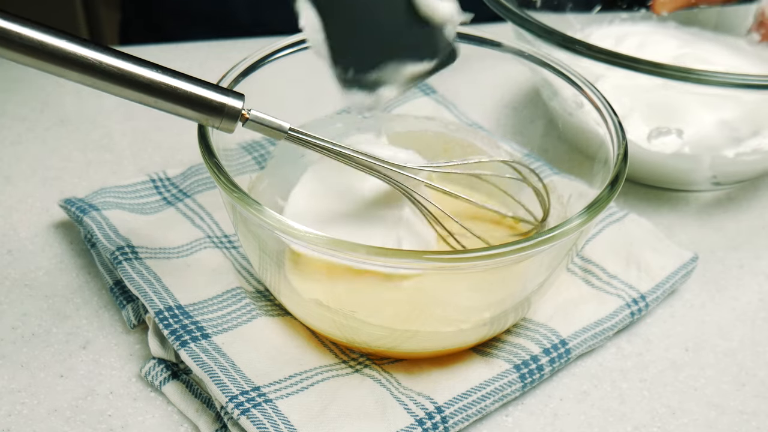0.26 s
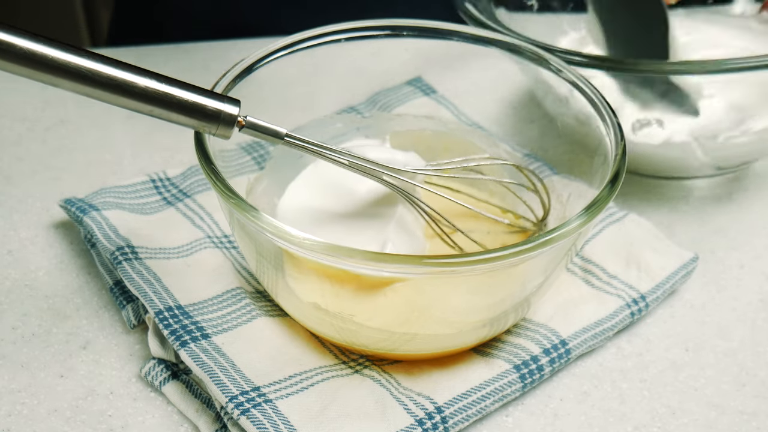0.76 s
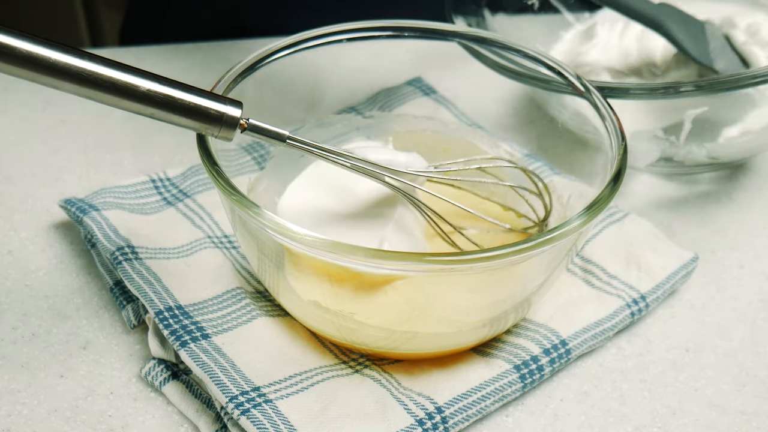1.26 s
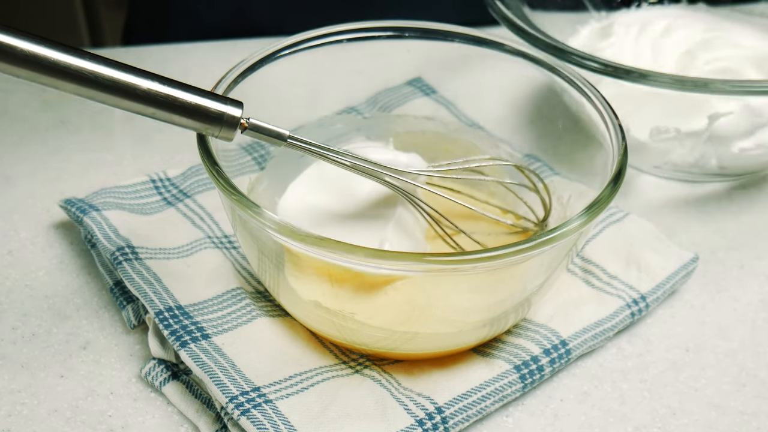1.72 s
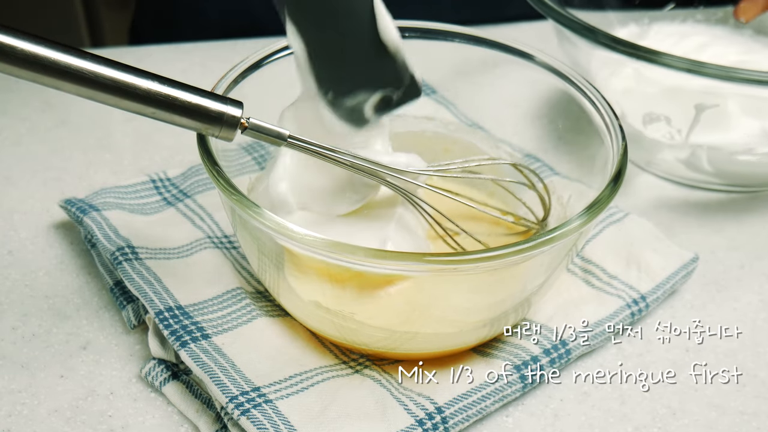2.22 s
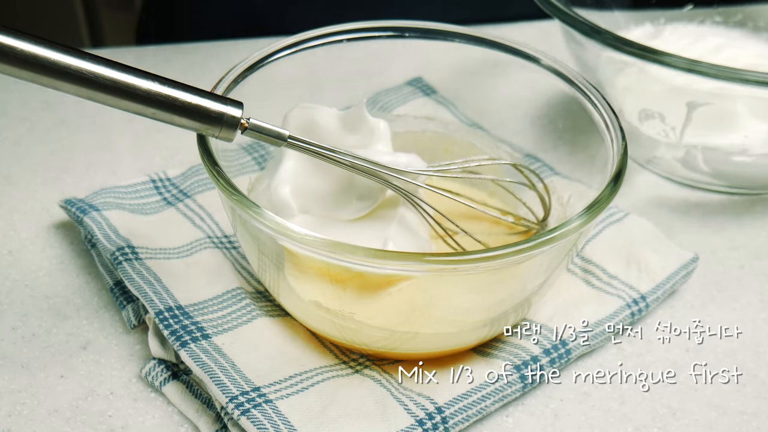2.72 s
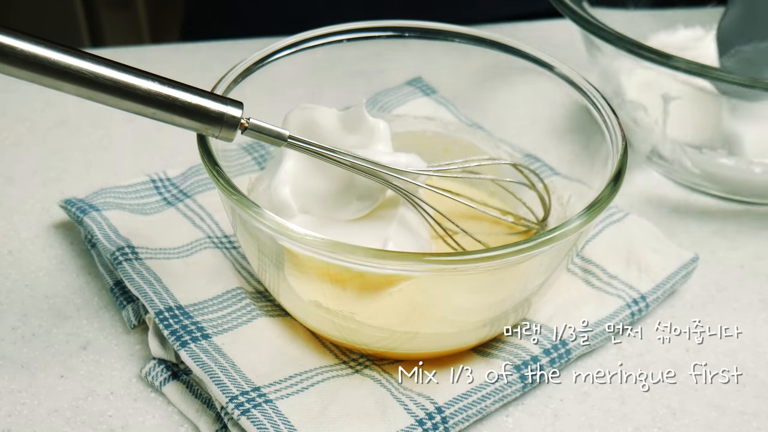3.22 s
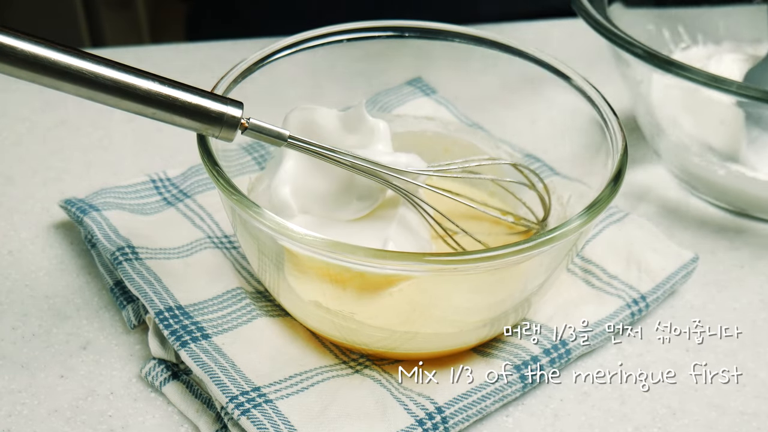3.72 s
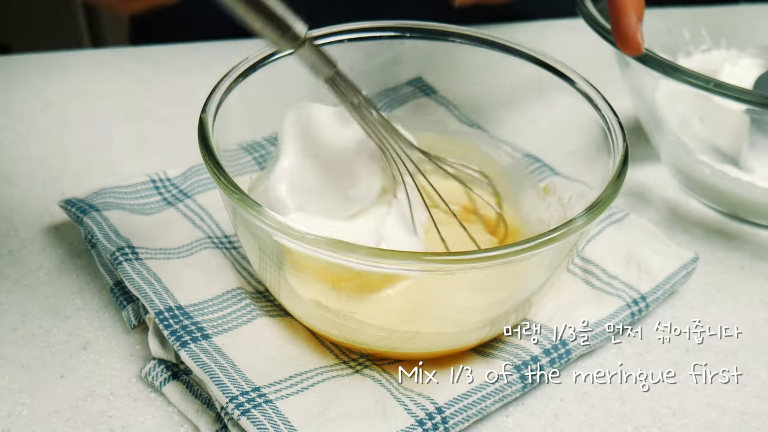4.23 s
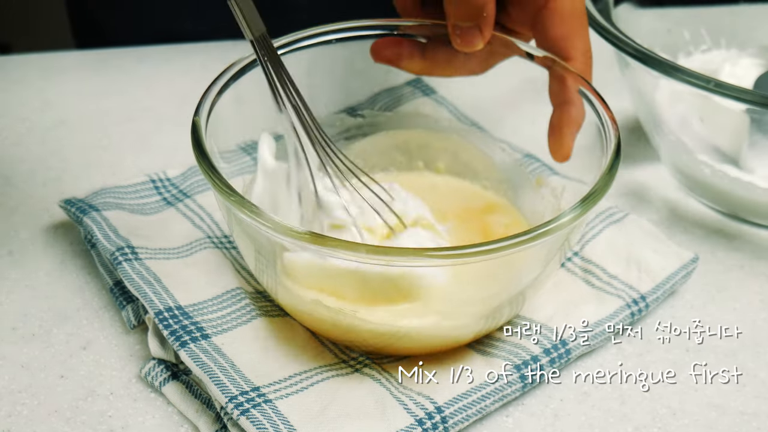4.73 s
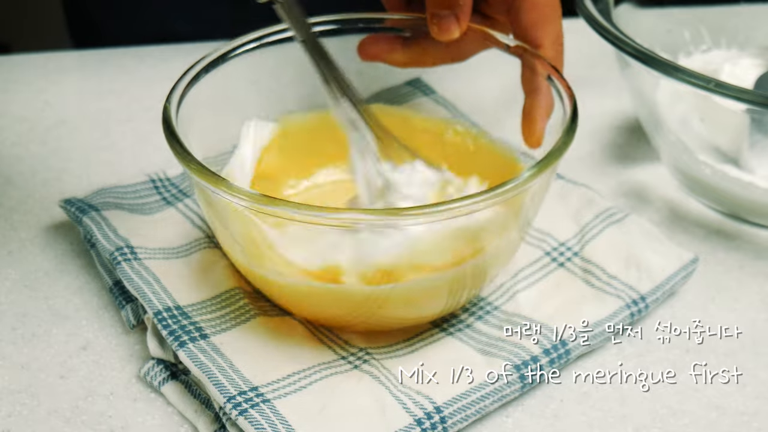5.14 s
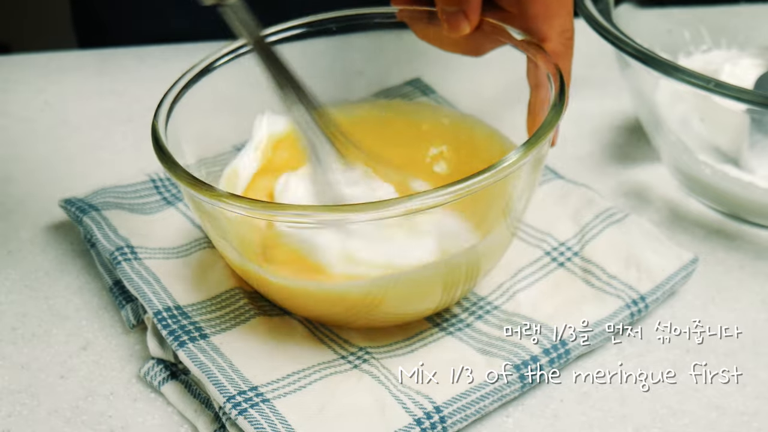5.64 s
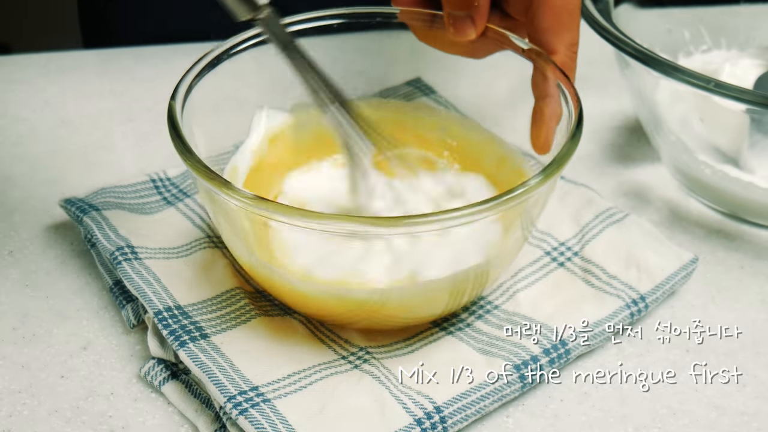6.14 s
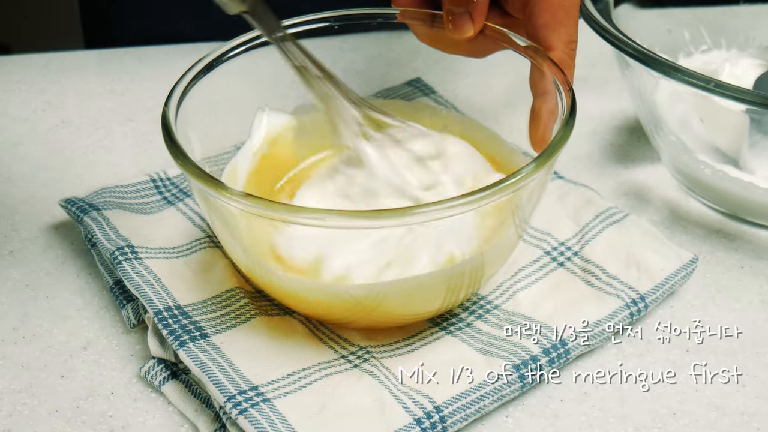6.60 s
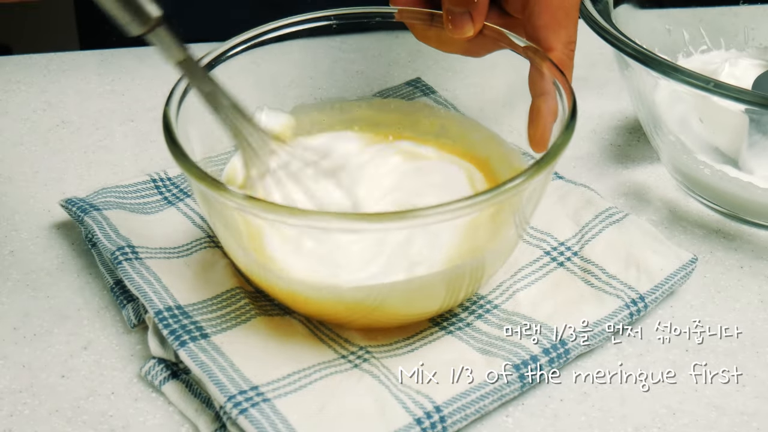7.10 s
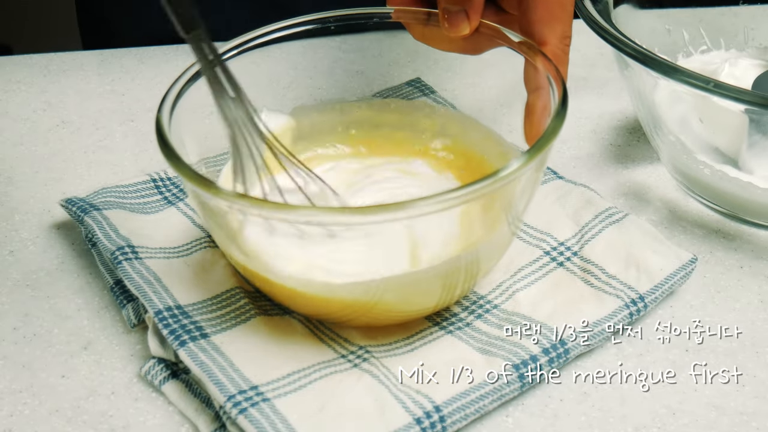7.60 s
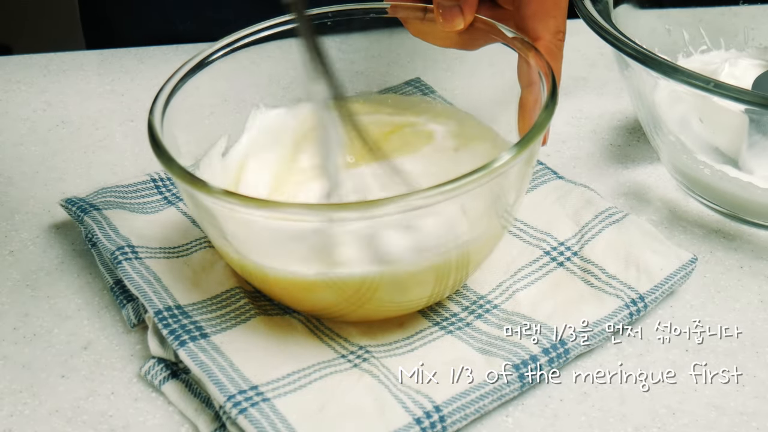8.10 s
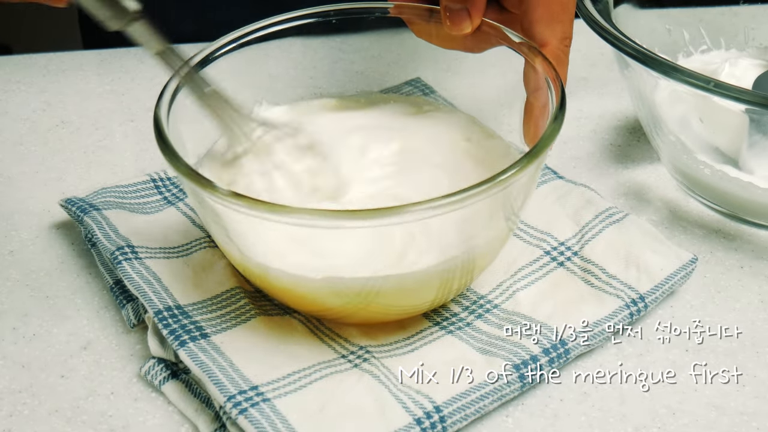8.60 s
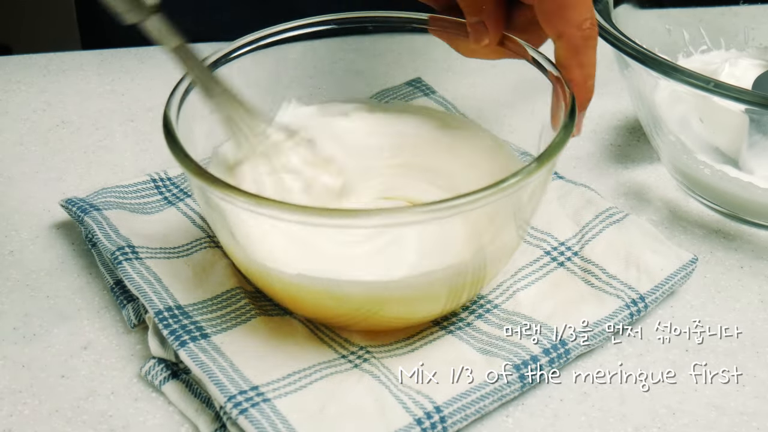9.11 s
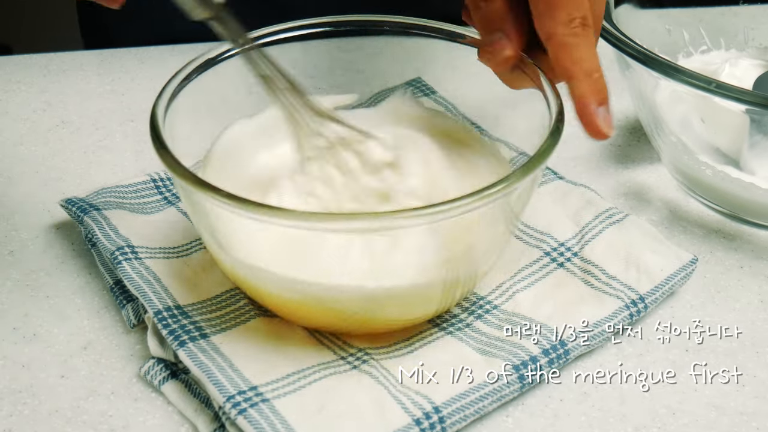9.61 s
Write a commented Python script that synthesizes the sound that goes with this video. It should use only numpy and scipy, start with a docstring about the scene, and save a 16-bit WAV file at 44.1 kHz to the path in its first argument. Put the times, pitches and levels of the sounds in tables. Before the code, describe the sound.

A quiet home kitchen, heard close and almost mono, with a faint refrigerator hum and soft air throughout. A brief spatula swish opens; a dull knock at 0.65 s leads into a loud, bright glass-on-glass clink at 0.73, with a lighter clinking cluster around 1.15. At 2.0 a hollow triple knock lands, followed by a short scraping slide. From 2.7 to 3.9 the bowl drags over the counter, with a heavy, dull set-down near 3.65. A soft swish and slight whisk contacts come around 4.1. From 4.7 a wire whisk stirs batter, tapping the glass wall sparsely and softly, with foam fizz. Taps thicken after 6.6; wet sloshing swells from about 7.2, and from 8 to 9.2 the ticking is rapid and uneven. The strongest sharp tap comes at 9.37, with a bright ringing touch just after, a low counter bump beneath, and final light taps near 9.75.

```python
"""Kitchen counter, two glass bowls: a spatula scoops from one, which clinks against its neighbour, slides and is
set down; then a wire whisk stirs batter in the other and taps its wall. A refrigerator hums throughout.
Glass and steel are dying sines plus noise bursts; stirring, drag and air are coloured noise; whistles are glides.
All sources sit at one spot, with a short room tail, level control and nearly mono channels."""
import sys
import numpy as np
from scipy import signal
from scipy.fft import rfft, irfft, next_fast_len
from scipy.io import wavfile
from scipy.ndimage import map_coordinates

SR = 44100
rng = np.random.default_rng(int(sys.argv[2]) if len(sys.argv) > 2 else 0)


def store_wav(level_fs):
    """Save 16-bit WAV to argv[1]."""
    pcm = np.round(np.clip(np.atleast_2d(level_fs), -1, 1) * 32767)
    wavfile.write(sys.argv[1], SR, pcm.T.astype(np.int16))


N = 434826

# Levels of colours, modes and notes are relative. Mode t60 holds before the ring share and 4.3 ms more.
# refrigerator hum lines: f/Hz, level/dB rms, waver/dB
HUM_LINES = [(70.8, -54, -0.5), (156.4, -60.5, 2.5), (294, -67.5, -4.5)]
# narrow steady noise: f/Hz, half width at half gain/Hz, level/dB
WHINE = (4113, 25, -79)
# kitchen air noise: f/Hz, density/dB
AIR_COLOUR = [(20, -25.5), (40, -5), (60, -23.5), (100, -12), (160, -11), (240, -8.5), (390, -7.5),
              (500, -15), (800, -18.5), (1150, -21.5), (2400, -62.5), (4200, -40.5), (9000, -66.5),
              (16000, -53)]
AIR_DB = -56

# spatula, bowl foot and wires moving: start/s, end/s, swish level/dB, fizz level/dB
STROKES = [(0.06, 0.284, -63, -61.5), (2.06, 2.351, -59, -77), (2.71, 3.94, -58, -94),
           (3.955, 4.42, -57.5, -63.5), (4.403, 5.06, -59.5, -66), (5.06, 8.125, -72.5, -69.5),
           (8.06, 9.095, -62, -70), (9.105, 9.9, -67, -69)]
# f/Hz, density/dB
SWISH_COLOUR = [(290, -37.5), (500, -1.5), (918, 1.5), (1540, -2), (1870, -6), (2330, -8), (2690, -8.5),
                (5910, -8.5), (11000, -26.5), (14300, -59.5), (22000, -120)]
# f/Hz, density/dB
FIZZ_COLOUR = [(5000, -8), (9000, -11.5), (16000, -9.5)]
# batter folding around the wires: t/s, level/dB
SLOSH_LEVELS = [(4.3, -80), (5.7, -69.5), (7.24, -60), (7.8, -62.5), (8.1, -60), (8.9, -61.5), (9.2, -73),
                (9.86, -67)]
# f/Hz, density/dB
BATTER_COLOUR = [(250, -34), (500, 1), (900, 5), (1600, -10.5), (3000, -40), (8000, -23.5)]
REST_SWISH_DB, REST_FIZZ_DB = -62.5, -75  # foam left alone
EDGE_S = .045  # fade in and out of a stroke

# thin paired whistles: start/s, length/s, top f/Hz, arc depth/share, upper level/dB, lower level/dB
WHISTLES = [(.217, 0.053, 14300, .03, -85, -65), (2.02, 0.073, 13600, .055, -72, -72),
            (2.148, 0.073, 14500, .08, -72, -67), (2.28, .058, 14550, .05, -67, -70),
            (3.945, 0.25, 15800, .15, -65, -65)]
WHISTLE_RATIO, WHISTLE_TOP_AT = .92, .43  # lower over upper pitch; arc top, share of length

# glass on glass: t/s, level/dB, hardness/dB per octave, small rim level/dB, large rim level/dB, ring time/share
CLINKS = [(0.7289, -1, 5, -13, -25.5, 0.83), (0.735, -2.5, -5, -14, -13, .26),
          (.827, -18.5, 4, -18, -12, .81), (1.13, -10.5, -0.5, -17, -8.5, 0.57),
          (1.146, -17.5, 5.5, -13.5, -5, 0.16), (1.153, -16, -5, -0.5, -13, 0.52),
          (1.162, -20.5, 6.5, -25, -5, .57), (1.169, -25, 10.5, -37, -3, 0.54)]
# bowl on counter or spatula: t/s, level/dB, hardness/dB per octave, hollow f/Hz, hollow level/dB,
# wall level/dB, ring time/share
DULL_KNOCKS = [(.643, -18.5, -8, 1245, -11, -17, 0.11), (1.084, -36.5, -3.5, 810, -7, -16.5, 1),
               (1.388, -29, -11.5, 950, -4, -21, 0.66), (1.989, -14.5, -4, 914, -15, -30, 0.39),
               (1.996, -17, -11.5, 1222, -1, -24, 0.21), (2.002, -14, -4.5, 1264, -7.5, -17.5, 0.37),
               (2.073, -34, -8.5, 1120, -8, -22, 0.55), (3.6505, -9.5, -6.5, 880, -17.5, -1.5, 0.92),
               (3.6555, -5.5, -14, 1270, -6.5, -17, 0.31), (3.672, -13.5, -13, 785, -10, -3, 0.76)]
CLINK_T60_S, CLINK_HOLLOW_HZ, CLINK_HOLLOW_DB, CLINK_WALL_DB = 0.05, 1290, -6.5, -15  # t60 of the crack
KNOCK_T60_S, KNOCK_RIM_DB = 0.078, -40  # t60 of the crack; the rims barely answer
# glass contact: f/Hz, level/dB
CRACK_COLOUR = [(150, -25), (400, 1.5), (1000, 10), (2500, 2.5), (6000, -17), (16000, -46)]
# bowl wall under a broad contact: f/Hz, level/dB, t60/s
WALL_MODES = [(305, -9, .11), (391, -15, .11), (502, -10, .09), (709, 0, .2), (1765, -11, .22)]
# smaller bowl rim: f/Hz, level/dB, t60/s
SMALL_RIM = [(1880, -6, .3), (2116, -12, .3), (2353, -14, .3), (3090, -4, .2), (3175, -1, .22),
             (3305, -4, .3), (4940, -8, .25), (6380, -18, .3), (6680, -15, .33), (7840, -14, .3),
             (8414, -25, .3), (9491, -27, .3), (10660, -24, .2), (11950, -23, .25), (12700, -26, .3),
             (14740, -28, .3)]
# larger bowl rim: f/Hz, level/dB, t60/s
LARGE_RIM = [(1744, -9, .3), (1949, -6, .26), (2033, -2, .16), (3230, -8, .24), (3365, -3, .19),
             (4753, -13, .25), (4846, -4, .22), (6880, -16, .36), (6977, -17, .34), (7203, -19, .3),
             (9184, -19, .22), (11840, -26, .3), (14720, -30, .25)]
# crowds of rim modes too dense to part: f/Hz, width/Hz, level/dB
CLATTER_PEAKS = [(1170, 300, 20), (2000, 180, -6), (3340, 200, -1), (4940, 300, 16), (6600, 500, -29.5),
                 (7610, 70, -38), (8800, 130, -24.5), (11700, 740, -17)]
BLUR_RAD = .36  # phase wander of ringing glass at 3 kHz per 32 samples

# bowl foot dragged over the counter: start/s, end/s, early colour level at start/dB, late colour level at end/dB
SLIDES = [(2.106, 2.363, -55.5, -60), (2.7, 3.265, -54.5, -63), (3.278, 3.948, -61, -52)]
# f/Hz, width/Hz, level/dB
EARLY_DRAG_PEAKS = [(910, 43, 4), (1120, 38, 5), (1510, 83, -1), (2150, 55, 3.5), (2400, 23, 4),
                    (2980, 49, -9), (4340, 51, -10)]
# f/Hz, width/Hz, level/dB
LATE_DRAG_PEAKS = [(1228, 46, 9), (1670, 20, 4), (2990, 200, -6), (4170, 95, -14), (4470, 100, -23)]
EARLY_FADE_DB, LATE_FADE_DB = 8.5, 0.5  # over the length of a drag
# counter shaken: start/s, end/s, level/dB
BUMPS = [(3.64, 3.87, -61), (9.25, 9.6, -57)]
# f/Hz, density/dB
BUMP_COLOUR = [(15, -41.5), (30, 10), (50, 2), (90, -35.5), (200, -120)]

# blows above the batter: t/s, level/dB, hardness/dB per octave, ring time/share, handle level/dB
RIM_BLOWS = [(4.125, -38.5, -11.5, 1.8, -30), (4.237, -42.5, -1, .6, 13), (7.838, -39.5, -21, 0.72, -30),
             (8.175, -28.5, -4.5, 0.52, -21), (8.459, -39, -8, 0.53, -16), (8.875, -40, -8, .6, -20),
             (9.415, -24, 4.5, 0.66, -20.5), (9.441, -31.5, 8, 0.43, 1), (9.781, -41, -16, 0.5, -30)]
# batter bowl rim: f/Hz, level/dB, t60/s
BATTER_RIM = [(752, -3.5, .19), (1735, -10.5, .15), (3070, -5.5, .19), (4735, -9, .16), (6751, -4, .17),
              (9141, -9, .22), (10600, -17, .1), (11960, -15, .08), (13950, -19, .1), (14670, -20, .1)]
# steel tube of the whisk: f/Hz, level/dB, t60/s
HANDLE_MODES = [(3200, -10.5, 0.29), (4915, -2, 0.091), (6200, -13.5, 0.18), (6790, -8, .22),
                (7100, -13, .15), (7800, -17, 0.22), (8660, -23, .15), (11000, -22, .2), (13090, -20, .2),
                (15200, -18, 0.09)]
# whisk on wall: t/s, level/dB, treble/dB, cavity f/Hz, cavity level/dB before trim, thud level/dB before trim
TAPS = [(4.725, -25, -15.5, 1336, -15, -15.5), (4.969, -39, -8, 980, -12, -11),
        (5.027, -34, -23.5, 1360, -20, -30), (5.379, -42, -18, 805, -22, -21),
        (5.557, -37.5, -34, 1206, -9, -19), (5.793, -35.5, -16, 1200, -7, -12),
        (6.008, -33.5, -25.5, 906, -10.5, -29), (6.088, -39, -7.5, 930, -26, -20),
        (6.196, -38.5, -2.5, 760, -21, -24), (6.228, -33.5, -18.5, 1330, -6.5, -15),
        (6.666, -28.5, -24, 1234, -6.5, -17), (6.885, -28, -21.5, 1243, -6.5, -27.5),
        (7.104, -36, -20, 1300, -4.5, -8), (7.311, -23, -11.5, 852, -7, -23),
        (7.378, -45, -17, 1057, -2, 4), (7.458, -45, -29, 1330, -1, -16), (7.516, -44, -20, 1030, -5, -14),
        (7.532, -26.5, -15, 1260, -7, -11), (7.557, -44, -21, 1145, 1, -18),
        (7.838, -35, -11.5, 798, 1.5, -18), (7.926, -34, -38, 977, -3.5, -13),
        (8.046, -38.5, -31.5, 723, -0.5, -8), (8.103, -31.5, -16, 750, -8, -9),
        (8.167, -35, -15.5, 703, -13, -12), (8.176, -22.5, -14.5, 900, -20, -31),
        (8.277, -25, -16, 908, -3.5, -39), (8.318, -40, -15, 820, -5, -28),
        (8.336, -26.5, -15.5, 780, -12.5, -34), (8.366, -40, -18, 1190, -3, -31),
        (8.387, -23.5, -14, 1197, -13, -26), (8.456, -21.5, -18, 1282, -11.5, -20.5),
        (8.548, -42.5, -11, 1010, -11, -13), (8.579, -22, -16.5, 980, -16, -13),
        (8.609, -24.5, -16, 694, -14, -11.5), (8.665, -40.5, -13.5, 1030, -11, -19),
        (8.688, -33, -17, 1210, -10, -24), (8.779, -41, -4, 685, -17, -30),
        (8.798, -17, -4.5, 1200, -15, -24), (8.844, -20.5, -13, 1356, -21, -13),
        (8.873, -30, -17.5, 1250, -7.5, -6), (8.914, -34.5, -20, 830, -17, -23),
        (8.955, -21, -17.5, 1390, -17, -30), (9.098, -21.5, -14.5, 966, -15.5, -14),
        (9.138, -33, -16, 765, -19, -18), (9.169, -29, -19, 1300, -8, -19),
        (9.336, -56, -13, 814, -16, -19), (9.372, -8.5, -6, 1260, -25, -28.5),
        (9.417, -27, -5, 796, -25, -41), (9.441, -26.5, 1, 780, -19, -38),
        (9.523, -33, -15, 908, -6.5, -12), (9.72, -27.5, -25.5, 1083, -6, -19),
        (9.771, -34, -23, 1300, -5, -19)]
# tap noise: f/Hz, level/dB, share of the tap's treble added
TAP_COLOUR = [(300, -6.5, 0), (600, 6, 0), (1100, 5, 0), (3500, 1.5, 0),
              (6500, 14.5, 1), (8500, -1.5, 1), (11500, 3.0, 1), (16000, -11, 1)]
TAP_RISE_S, TAP_T60_S = 0.001, 0.051
LANDING_DB = 3.5  # scatter of the wire contacts
WIRE_HZ, WIRE_DB, WIRE_T60_S = 2920, -13, .028  # WIRE_HZ holds at -20 dB treble
WIRE_CLIMB = 0.078  # octaves per dB of treble
THUD_HZ = 330.3  # bowl bouncing on the cloth
CAVITY_TRIM_DB, THUD_TRIM_DB = 1.0, 0.5
FAINT_FROM_S, FAINT_TO_S, FAINT_DB = 5.2, 9.4, -43  # weak taps between the strong ones; loudest level

# room decay: f/Hz, t60/s
ROOM_T60 = [(200, 0.44), (2000, 0.28), (12000, 0.19)]
# channel mismatch: f/Hz, side relative to mid/dB
MISMATCH = [(100, -43.5), (1000, -64.5), (4000, -48.5), (15000, -37.5)]
# noise the channels do not share: f/Hz, density/dB
HISS_COLOUR = [(18, -69), (30, -28.5), (179, 1.5), (319, -6), (364, 4.5), (760, -0.5), (2540, -1),
               (14000, -2.5), (16000, -14.5)]
HISS_DB = -78
CEILING, TOP_HZ = .8, 16100  # peak limit; band limit


def amp(db):
    """Gain of a level in dB."""
    return 10 ** (np.asarray(db) / 20)


def unit(x):
    """x at rms 1."""
    return x / np.sqrt(np.mean(x ** 2) + 1e-20)


def along(points, hz):
    """(Hz, value) points interpolated on a log axis."""
    f, v = np.transpose(points)
    return np.interp(np.log(hz + 1), np.log(f + 1), v)


def curve(points, outside=None):
    """(s, value) points interpolated at every sample."""
    s, v = np.transpose(points)
    return np.interp(np.arange(N) / SR, s, v, outside, outside)


def wobble(rate_hz):
    """Smooth random curve, rate_hz knots a second."""
    knots = rng.standard_normal(int(N * rate_hz / SR) + 4)
    return map_coordinates(knots, [np.arange(N) * rate_hz / SR])


def stroke(start_s, end_s):
    """Gain that fades in, holds and fades out."""
    t = np.arange(N) / SR
    return np.clip(np.minimum(t - start_s, end_s - t) / EDGE_S + .5, 0, 1)


def filtered(x, response):
    """x times a response of frequency."""
    m = next_fast_len(len(x) + 4096)
    return irfft(rfft(x, m) * response(np.fft.rfftfreq(m, 1 / SR)), m)[:len(x)]


def coloured(points):
    """Gain over frequency from (Hz, dB) points."""
    return lambda hz: amp(along(points, hz))


def resonances(peaks):
    """Gain of a sum of (Hz, width Hz, dB) resonance peaks."""
    return lambda f: sum(amp(db) * w * f / np.abs(c * c - f * f + 1j * f * w) for c, w, db in peaks)


def noise(gain, size=N):
    """Noise of rms 1 with a colour."""
    return unit(filtered(rng.standard_normal(size), gain))


def ring(modes, t, share=1, hard_db=0, scatter_db=0, rough=0):
    """Dying sines at random strengths; hardness tilts modes above 3 kHz, rough blurs the phase."""
    hz, db, t60 = np.array(modes).T[:, :, None]
    level_db = db + hard_db * np.maximum(np.log2(hz / 3000), 0)
    level_db = level_db + scatter_db * rng.standard_normal(hz.shape)
    steps = rng.standard_normal((len(hz), len(t) // 32 + 1)).repeat(32, axis=1)[:, :len(t)]
    drift = np.cumsum(steps, axis=1) / 32
    fade = amp(level_db - 60 * t / (np.abs(t60 * share) + 0.0043))
    phase = 2 * np.pi * hz * t + rough * np.sqrt(hz / 3000) * drift
    return np.sum(fade * np.sin(phase), axis=0)


def add(track, s, x):
    """Mix x into track from time s."""
    track[round(s * SR):][:len(x)] += x


def kitchen():
    """Hum lines wavering in level and phase, and a faint narrow whine, over steady air noise."""
    t, hum = np.arange(N) / SR, np.zeros(N)
    for hz, db, waver_db in HUM_LINES:
        level = np.sqrt(2) * amp(db + waver_db * wobble(9.1))
        hum += level * np.sin(2 * np.pi * hz * t + 0.2 * waver_db * wobble(6.6))
    whine_hz, half_width_hz, whine_db = WHINE
    whine = amp(whine_db) * noise(lambda hz: 1 / (1 + ((hz - whine_hz) / half_width_hz) ** 2))
    return hum + whine + amp(AIR_DB) * noise(coloured(AIR_COLOUR))


def stirring():
    """Spatula and wires swish; foam bubbles fizz as noise of fast uneven level; batter sloshes in lumps."""
    swish_gain = np.hypot(amp(REST_SWISH_DB), sum(amp(db) * stroke(a, b) for a, b, db, _ in STROKES))
    fizz_gain = np.hypot(amp(REST_FIZZ_DB), sum(amp(db) * stroke(a, b) for a, b, _, db in STROKES))
    swish = swish_gain * amp(1.6 * wobble(30) + 1.2 * wobble(6)) * noise(coloured(SWISH_COLOUR))
    spikes = rng.standard_normal(N) * amp(2.8 * wobble(880))
    fizz = fizz_gain * amp(1.1 * wobble(16.0)) * unit(filtered(spikes, coloured(FIZZ_COLOUR)))
    lumps = unit(amp(4.5 * wobble(45)) * noise(coloured(BATTER_COLOUR)))
    return swish + fizz + amp(curve(SLOSH_LEVELS, outside=-120)) * lumps


def whistles():
    """Faint high tones glide along arcs, two at a time, with a fluttering level."""
    track, flutter_db = np.zeros(N + SR), 3 * wobble(40)
    for start_s, length_s, top_hz, depth, upper_db, lower_db in WHISTLES:
        u = np.linspace(0, 1, round(length_s * SR))
        hz = top_hz * (1 - depth * (2 * (u - WHISTLE_TOP_AT)) ** 2)
        phase = 2 * np.pi * np.cumsum(hz) / SR
        pair = amp(upper_db) * np.sin(phase) + amp(lower_db) * np.sin(WHISTLE_RATIO * phase)
        add(track, start_s, np.abs(np.sin(np.pi * u)) ** 0.33 * pair)
    return amp(flutter_db) * track[:N]


def bowls():
    """Each contact is a noisy crack, a short hollow note and the ring of wall and rims."""
    track, t = np.zeros(N + SR), np.arange(SR // 3) / SR
    clinks = [(s, db, hard_db, CLINK_T60_S, CLINK_HOLLOW_HZ, CLINK_HOLLOW_DB, CLINK_WALL_DB, *rims)
              for s, db, hard_db, *rims in CLINKS]
    knocks = [(s, db, hard_db, KNOCK_T60_S, *wall, KNOCK_RIM_DB, KNOCK_RIM_DB, share)
              for s, db, hard_db, *wall, share in DULL_KNOCKS]
    for s, db, hard_db, t60_s, hollow_hz, hollow_db, wall_db, small_db, large_db, share in clinks + knocks:
        colour = lambda hz: amp(along(CRACK_COLOUR, hz) + hard_db * np.log2(hz / 1000 + 0.022))
        crack_fade = amp(-7.5 - 60 * t / t60_s) + amp(-9 - 60 * t / 0.0056)
        crack = crack_fade * noise(colour, size=len(t))
        clatter_fade = amp(-6.5 - 60 * t / (0.089 * abs(share) + 0.0083))
        clatter = clatter_fade * noise(resonances(CLATTER_PEAKS), size=len(t))
        rim = amp(max(small_db, large_db)) * clatter
        for rim_db, modes in [(small_db, SMALL_RIM), (large_db, LARGE_RIM)]:
            rim = rim + amp(rim_db) * ring(modes, t, share, scatter_db=5.0, rough=BLUR_RAD)
        wall = amp(wall_db) * ring(WALL_MODES, t, share, scatter_db=1.5)
        hollow = ring([(hollow_hz, hollow_db, .07)], t, rough=0.68)
        onset = 1 - np.exp(-t / (0.0003 * amp(-.4 * hard_db)))  # soft contacts build up slowly
        add(track, s, amp(db) * (crack + wall + hollow + rim) * onset)
    return filtered(track[:N], lambda hz: (1j * hz / (150 + 1j * hz)) ** 2)  # steep cut of the bass below 150 Hz


def slide():
    """Dragging feeds noise into resonances that change on the way; low noise shakes the counter."""
    early = sum(amp(curve([(a, db), (b, db - EARLY_FADE_DB)])) * stroke(a, b) for a, b, db, _ in SLIDES)
    late = sum(amp(curve([(a, db + LATE_FADE_DB), (b, db)])) * stroke(a, b) for a, b, _, db in SLIDES)
    drag = early * noise(resonances(EARLY_DRAG_PEAKS)) + late * noise(resonances(LATE_DRAG_PEAKS))
    drag = amp(1.8 * wobble(60)) * drag
    shake = noise(coloured(BUMP_COLOUR)) * sum(amp(db) * stroke(a, b) for a, b, db in BUMPS)
    return drag + shake


def rim_blows(track):
    """Whisk blows above the batter ring the glass rim and the steel handle."""
    t = np.arange(SR // 4) / SR
    for s, db, hard_db, share, handle_db in RIM_BLOWS:
        colour = lambda hz: amp(along(CRACK_COLOUR, hz) + hard_db * np.log2(hz / 3000 + .05))
        click = amp(-37.0 - 60 * t / .03) * noise(colour, size=len(t))
        glass = ring(BATTER_RIM, t, share, hard_db, scatter_db=5.0, rough=BLUR_RAD / 2)
        handle = amp(handle_db) * ring(HANDLE_MODES, t, rough=0.065)
        add(track, s, amp(db - 6.5) * (click + glass + handle))


def faint_taps(count):
    """Rows like TAPS at random times, growing slightly denser."""
    rows = []
    for when, size, bright, pitch, thud in rng.random((count, 5)):
        s = FAINT_FROM_S + (FAINT_TO_S - FAINT_FROM_S) * when ** 0.87
        rows.append((s, FAINT_DB - 8 * size, -32 + 24 * bright, 720 * 1.9 ** pitch, -6, -20 + 20 * thud))
    return rows


def wall_taps(track):
    """Wires land unevenly on the wall: a noise tick with cavity, wire and thud notes."""
    t = np.arange(SR // 7) / SR
    f_hz, base_db, treble_share = np.transpose(TAP_COLOUR)
    for s, db, treble_db, cavity_hz, cavity_db, thud_db in TAPS + faint_taps(count=60):
        colour = coloured(np.transpose([f_hz, base_db + treble_share * treble_db]))
        landing = amp(LANDING_DB * np.repeat(rng.standard_normal(len(t) // 64 + 1), 64)[:len(t)])
        fade = amp(-10.5 - 60 * t / TAP_T60_S) + amp(-12.5 - 60 * t / 0.017)  # sharp first contact, then the rest
        tick = fade * landing * noise(colour, size=len(t))
        tick = tick * np.linalg.norm(fade) / np.linalg.norm(tick)  # energy free of the random draw
        wire_hz = WIRE_HZ * 2 ** max(WIRE_CLIMB * (treble_db + 20), -.45)
        cavity = ring([(cavity_hz, cavity_db + CAVITY_TRIM_DB, .06)], t, rough=0.7)
        wire_thud = [(wire_hz, WIRE_DB, WIRE_T60_S), (THUD_HZ, thud_db + THUD_TRIM_DB, .12)]
        notes = cavity + ring(wire_thud, t, rough=0.17)
        add(track, s, amp(db) * (tick + notes) * (1 - np.exp(-t / TAP_RISE_S)) ** 2)


def whisk():
    """Rim blows and wall taps through a gentle bass cut."""
    track = np.zeros(N + SR)
    rim_blows(track)
    wall_taps(track)
    return filtered(track[:N], lambda hz: 1j * hz / (120 + 1j * hz))


def prickle(count, level_db, spread_db):
    """Single wires flick the wall at random: damped blips of a few cycles."""
    track, t = np.zeros(N + SR), np.arange(400) / SR
    for when, pitch, size in rng.random((count, 3)):
        hz = 1200 * 7.5 ** pitch
        fade = amp(level_db - spread_db * np.log(size + 1e-3) - 60 * t * hz / 22)  # -60 dB in 22 cycles
        add(track, 4.4 + 5.4 * when ** .7, fade * np.sin(2 * np.pi * hz * t))
    return track[:N]


def room(x):
    """Noise tail in which each frequency dies at its own speed, as off the walls."""
    hz, t, z = signal.stft(rng.standard_normal(SR // 2), SR, nperseg=256)
    tail = signal.istft(z * amp(-60 * t / along(ROOM_T60, hz)[:, None]), SR, nperseg=256)[1]
    delayed = np.pad(x, (200, 0))
    return signal.fftconvolve(delayed, tail / np.linalg.norm(tail))[:N]


def scene():
    """All sources at one spot."""
    glass = bowls()
    wire = whisk() + prickle(count=650, level_db=-59.5, spread_db=2.5)
    echo = room(amp(-12.5) * glass + amp(-15) * wire)
    mono = kitchen() + stirring() + whistles() + glass + slide() + wire + echo
    return np.array([mono, mono])


def compressed(x, knee_db, slope, attack_s, release_s):
    """Gain falls when the short-term power passes the knee and returns slowly."""
    def smooth(v, s):
        """One-pole average over s seconds."""
        keep = np.exp(-1 / (s * SR))
        return signal.lfilter([1 - keep], [1, -keep], v)

    over_db = np.maximum(10 * np.log10(smooth(x ** 2, attack_s) + 1e-12) - knee_db, 0)
    cut_db = np.maximum(smooth(over_db, attack_s), 3.7 * smooth(over_db, release_s))
    return x * amp(-slope * cut_db)


def record(dry):
    """Gain control, then channels that differ by hiss and a faint smeared copy; band limit last."""
    mid = compressed(dry[0], knee_db=-20, slope=0.7, attack_s=0.0043, release_s=0.057)
    mid = mid / (1 + np.abs(mid / CEILING) ** 4) ** (1 / 4)  # rounds peaks that outrun the gain control
    smear = rng.standard_normal(512)
    copy = signal.fftconvolve(mid, smear / np.linalg.norm(smear), "same")
    side = filtered(copy, coloured(MISMATCH)) + amp(HISS_DB) * noise(coloured(HISS_COLOUR))
    return np.array([filtered(x, lambda hz: hz < TOP_HZ) for x in (mid + side, mid - side)])


dry = scene()
out = record(dry)
store_wav(out)
```